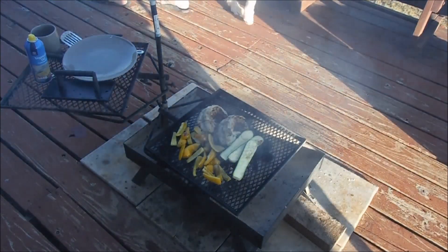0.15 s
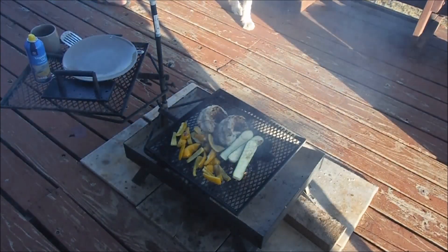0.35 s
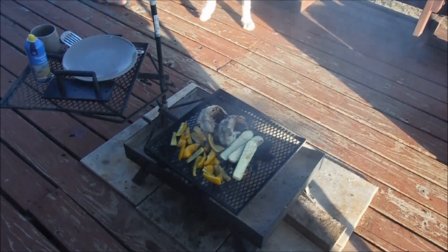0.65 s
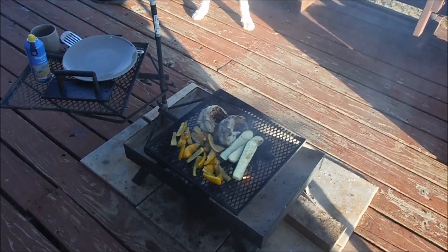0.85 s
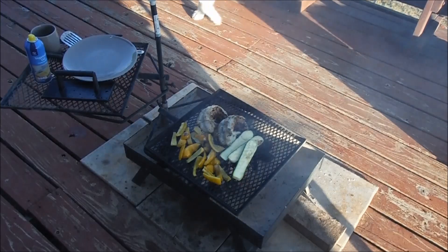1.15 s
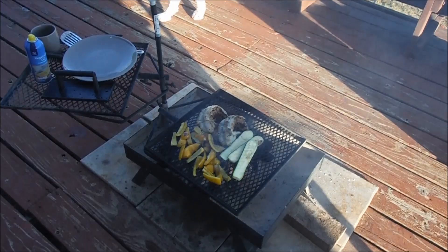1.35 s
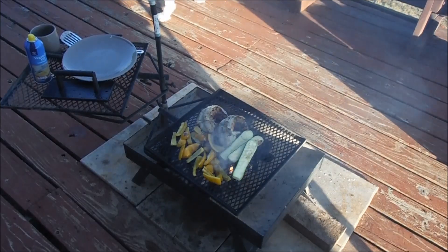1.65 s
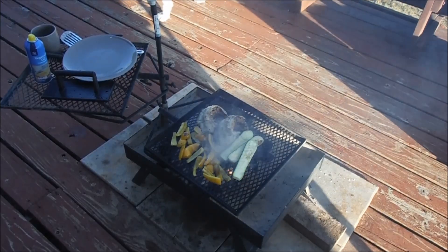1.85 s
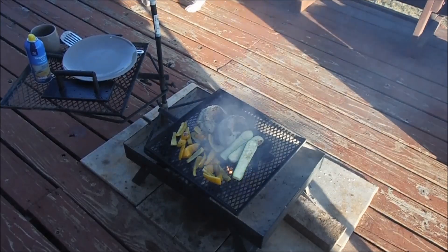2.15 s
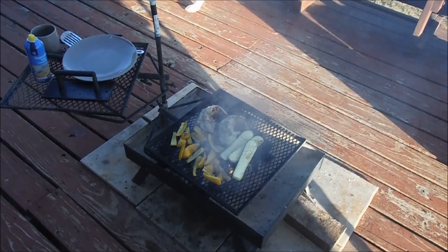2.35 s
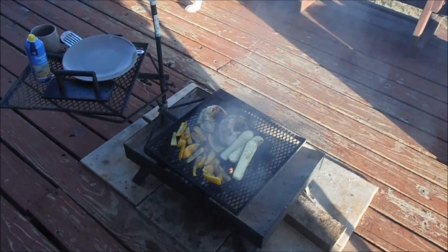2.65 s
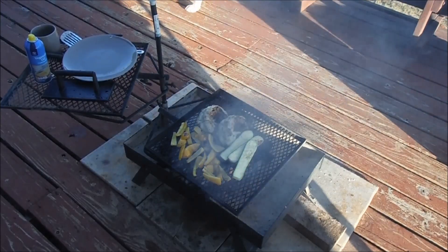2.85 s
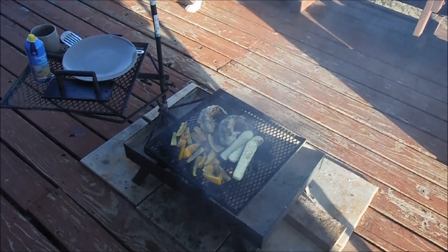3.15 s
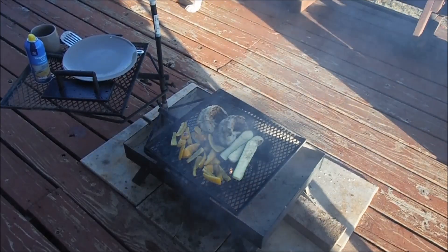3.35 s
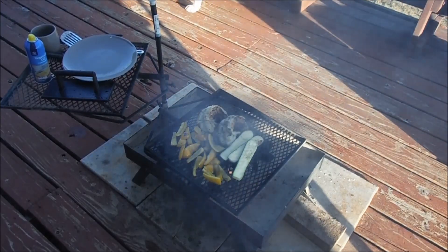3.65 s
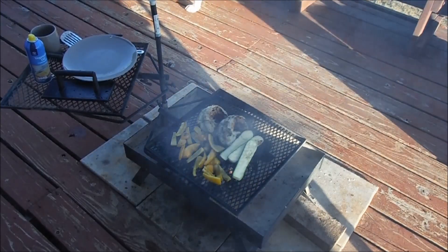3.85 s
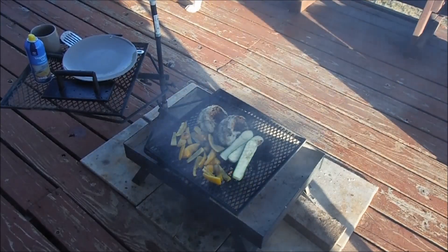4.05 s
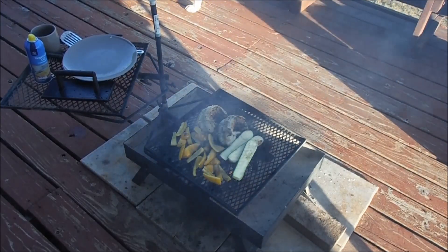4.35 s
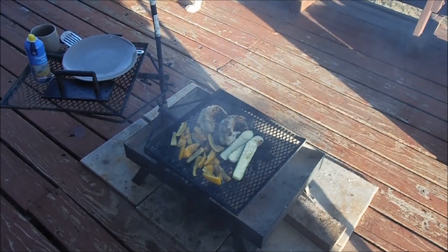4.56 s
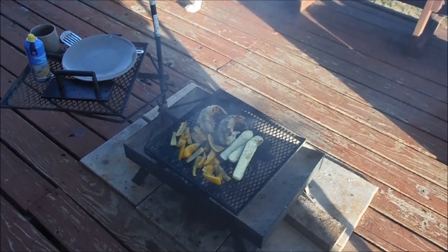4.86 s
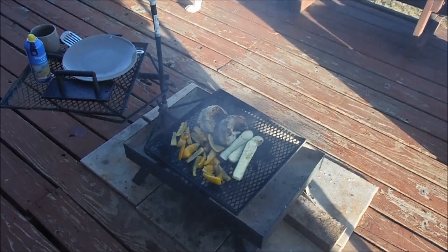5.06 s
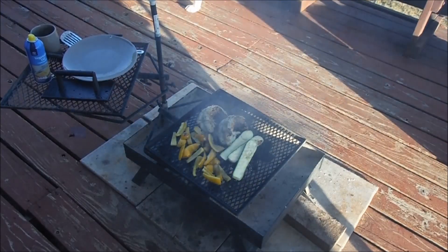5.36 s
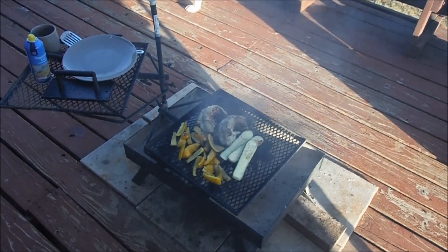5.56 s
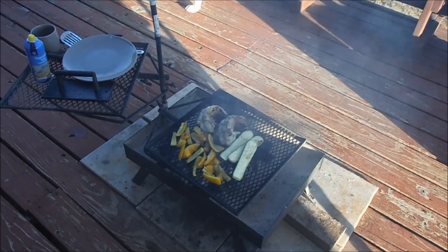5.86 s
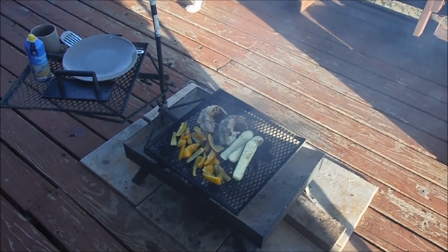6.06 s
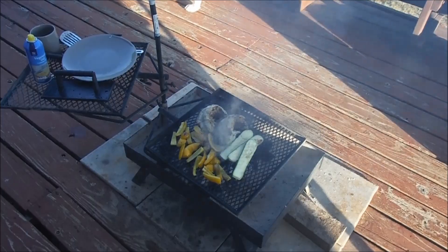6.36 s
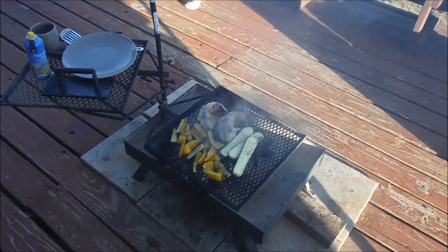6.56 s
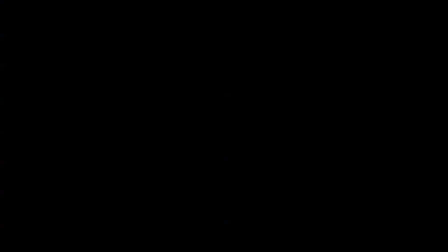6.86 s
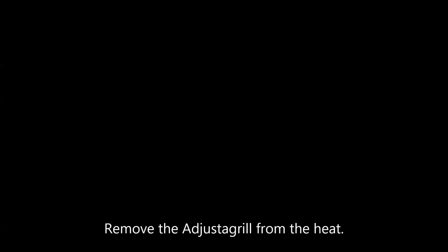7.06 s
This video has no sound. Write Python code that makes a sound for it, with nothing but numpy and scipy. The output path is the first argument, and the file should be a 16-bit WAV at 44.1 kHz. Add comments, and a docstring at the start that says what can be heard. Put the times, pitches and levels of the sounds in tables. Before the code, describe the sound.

A fine, high grill sizzle with scattered spits of fat and a faint hum, then close handling thumps and a sudden stop.

```python
"""A wooden deck outdoors, the microphone close to a charcoal grill of seafood and vegetables.
Behind it lie low air, a faint mains hum and a dog's paws scuffing the boards. Up front, tiny steam
bubbles burst on the food, fat spits, and juice boils and flares on the coals. Near the end a hand
rubs and knocks the camera, overloading its microphone, and switches it off."""
import sys
import numpy as np
from scipy import signal
from scipy.fft import rfft, irfft, next_fast_len
from scipy.io import wavfile
from scipy.ndimage import uniform_filter1d

SR = 44100
rng = np.random.default_rng(int(sys.argv[2]) if len(sys.argv) > 2 else 0)


def put_to_file(sound):
    """Save the sound as 16-bit audio at rate SR, in the file named by the first command-line argument."""
    columns = np.atleast_2d(sound).T  # one column per channel
    safe = np.clip(columns, -1, 1)
    whole_steps = np.round(safe * 32767)
    wavfile.write(sys.argv[1], SR, whole_steps.astype(np.int16))


N = 318402
TIME = np.arange(N) / SR


def undb(db):
    """Decibels to gain."""
    return 10 ** (np.asarray(db) / 20)


def unit(x):
    """Scale to rms 1."""
    return x / np.sqrt(np.mean(x ** 2))


def curve(rows):
    """Join (time, value) rows into a line through the scene."""
    return np.interp(TIME, *np.transpose(rows))


def colour(x, points):
    """Causal filter with the given (Hz, dB) outline; the result has rms 1."""
    size = 2 * next_fast_len(N // 2 + 4096)
    hz, db = np.transpose(points)
    gain = undb(np.interp(np.log(np.fft.rfftfreq(size, 1 / SR) + 1), np.log(hz), db))
    cepstrum = irfft(np.log(gain))
    cepstrum[1:size // 2] *= 2  # fold to minimum phase
    cepstrum[size // 2 + 1:] = 0
    return unit(irfft(rfft(x, size) * np.exp(rfft(cepstrum)))[:N])


def resonate(x, hz, width):
    """One resonance, gain 1 at its centre."""
    hz = min(hz, .45 * SR)
    w = 2 * np.pi * hz / SR
    a = np.sin(w) * width / hz / 2
    return signal.lfilter([a, 0, -a], [1 + a, -2 * np.cos(w), 1 - a], x)


def add(track, s, sound):
    """Mix a sound in from time s."""
    start = max(int(s * SR), 0)
    track[start:start + len(sound)] += sound[:N - start]


def walk(per_s):
    """Slow random drift with a spread near 1."""
    step = int(SR / per_s)
    held = np.repeat(rng.standard_normal(N // step + 1), step)
    return uniform_filter1d(held, step)[:N] * np.sqrt(3 / 2)


def bursts(per_s, spread_db):
    """Random tiny clicks, many weak and a few strong."""
    strength = np.minimum(rng.exponential(size=N), 6)
    clicks = (rng.random(N) < per_s / SR) * rng.choice([-1, 1], N)
    return unit(clicks * undb(spread_db * strength))


def swell(t, rise, fall):
    """A rounded rise to 1 at t = 0, then an exponential fall."""
    return np.exp(-np.where(t < 0, (t / rise) ** 2 / 2, t / fall))


def struck(modes, t):
    """Each mode's fading sine, one row a mode; wide modes start stronger and die sooner."""
    first_width = modes[0][1]
    return np.array([undb(db) * width / first_width * np.exp(-np.pi * width * t)
                     * np.sin(2 * np.pi * hz * t) for hz, width, db in modes])


def gritty_strokes(strokes, body, grit_db, spread):
    """Noise of friction or steam swells and dies with each stroke, and rings the body next to it."""
    out, t = np.zeros(N), TIME[:2 * SR // 3] - .2
    for s, db, rise, fall, hz, body_db in strokes:
        grit = rng.standard_normal(len(t)) * undb(grit_db * rng.standard_normal(len(t)))
        stroke = swell(t, rise, fall)
        rasp = unit(resonate(resonate(grit, hz, spread * hz), hz, 2 * spread * hz))
        ring = unit(sum(undb(g) * resonate(rng.permutation(grit), f, w) for f, w, g in body))
        lingering = np.where(t < 0, stroke, stroke ** 0.59)
        add(out, s + t[0], undb(db) * (rasp * stroke + undb(body_db) * ring * lingering))
    return out


# Open air around the deck: (frequency [Hz], relative level [dB])
AIR_SPECTRUM = [(20, -6.5), (40, -0.5), (60, -0.5), (85, -0.5), (140, -7), (250, -9.5), (400, -14),
                (700, -16.5), (1200, -19.5), (2500, -25), (8000, -41)]
# Mains hum in the background: (frequency [Hz], level [dB])
HUM_PARTIALS = [(59.9, -68.5), (120.2, -56.5), (179.7, -72.5)]
def outdoors(breeze_db=-52, drops_s=3.32, fall_db_per_s=0.9):
    """Low, gently moving air holds and then dies down over a steady hum."""
    air_db = breeze_db - fall_db_per_s * np.maximum(TIME - drops_s, 0)
    air = colour(rng.standard_normal(N), AIR_SPECTRUM) * undb(air_db + .7 * walk(4))
    hum = sum(np.sqrt(2) * undb(db) * np.sin(2 * np.pi * hz * TIME + .15 * walk(3))
              for hz, db in HUM_PARTIALS)
    return air + hum


# Paws off-mic: (time [s], level [dB], rise [s], fall [s], centre [Hz], board share [dB])
PAW_SCUFFS = [(2.241, -42, 0.0051, .008, 1060, -11), (2.260, -38, 0.01, 0.032, 1950, -2.5),
              (2.305, -37.5, 0.0071, 0.014, 1100, -15), (2.431, -39.5, 0.0011, 0.0082, 1120, -10),
              (2.585, -52.5, 0.013, 0.03, 520, -20), (2.655, -46.5, 0.0056, 0.01, 700, -3),
              (2.912, -40.5, 0.0017, 0.01, 1830, 0.5), (2.965, -35, 0.0011, 0.0098, 2100, 4.5)]
# Deck boards underfoot: (frequency [Hz], width [Hz], level [dB])
BOARD_MODES = [(216, 46, 9), (298, 130, 1.5), (544, 100, .5), (960, 160, 0), (1320, 160, -2),
               (1800, 220, 3), (2400, 440, -9), (6000, 4000, -4)]
def paws():
    """A dog's paws scrape the deck and set its boards ringing."""
    return gritty_strokes(PAW_SCUFFS, BOARD_MODES, grit_db=6.0, spread=1.13)


# Handling rumble, through the case into the microphone: (frequency [Hz], relative level [dB])
RUMBLE_SPECTRUM = [(12, -0.5), (30, -2.5), (60, -5.5), (120, -12), (250, -20.5), (500, -29.5), (1000, -42),
                   (3000, -60)]
# Squeezes on the case: (time [s], level [dB], rise [s], fall [s])
CASE_SQUEEZES = [(6.036, -31, .008, 0.016), (6.331, -19, .04, 0.05), (6.486, -17.5, 0.034, .011),
                 (6.585, -15.5, .015, 0.015)]
def grip(from_s=5.94, to_s=6.63, hold_db=-39.5, grab_db_per_s=195, release_db_per_s=94.5):
    """The case flexes and rumbles as the hand takes hold, squeezes and lets go."""
    grab_db = grab_db_per_s * np.maximum(from_s - TIME, 0)
    release_db = release_db_per_s * np.maximum(TIME - to_s, 0)
    hold = undb(hold_db - grab_db - release_db)
    squeezes = sum(undb(db) * swell(TIME - s, rise, fall) for s, db, rise, fall in CASE_SQUEEZES)
    return colour(rng.standard_normal(N), RUMBLE_SPECTRUM) * (hold + squeezes)


# Finger knocks right at the microphone:
# (time [s], push [dB], contact [s], crack [dB], brightness [Hz], spread over the modes [octaves])
FINGER_KNOCKS = [(5.81, -32, 0.00077, -33, 6000, 1.4), (5.9039, -27, 0.00028, -16.5, 8140, 0.47),
                 (5.9156, 5, 0.00035, -13.5, 2400, 1.9), (6.348, -26.5, .0004, -35.5, 4500, 1.7),
                 (6.4081, -14.5, .0004, -14.5, 5500, 1.3), (6.4271, 2.5, .0006, -1, 5250, 2.0),
                 (6.448, -16, 0.00028, -19.5, 4840, 1.8), (6.4664, -2, 0.00074, -32, 1000, 1.0),
                 (6.507, -28, .0002, -40, 1800, .92), (6.553, -16.5, 0.001, -42.5, 1500, 1.0),
                 (6.5835, 7.5, .0005, -7, 3080, 0.31), (6.601, 3, 0.0072, -40.5, 3000, 1.2),
                 (6.615, -7.5, 0.0005, -12, 3650, 1.34)]
# The camera's shell: (frequency [Hz], width [Hz], level [dB])
SHELL_MODES = [(660, 360, 5.5), (1320, 420, 3), (2000, 350, 2.5), (3080, 220, 2), (3720, 300, 0),
               (5170, 360, -1), (7260, 870, -1.5), (8650, 450, -2.5), (13600, 2600, -7)]
def knocks(crack_s=0.0005, shell_db=-3.5, leak_hz=15):
    """A finger pushes on the microphone's air pocket; as it lets go the shell cracks and rings."""
    push, crack, t = np.zeros(N), np.zeros(N), TIME[:4096]
    shell, shell_hz = struck(SHELL_MODES, t), np.array(SHELL_MODES)[:, 0]
    for s, push_db, contact, crack_db, hz, octaves in FINGER_KNOCKS:
        add(push, s, -undb(push_db) * t / contact * np.exp(1 - t / contact))
        # each spot on the shell wakes its own modes, in either direction
        reach = np.exp(-(np.log2(shell_hz / hz) / octaves) ** 2) * rng.choice([-1, 1], len(shell))
        snap = rng.standard_normal(len(t)) * np.exp(-t / crack_s)
        snap = resonate(resonate(snap, hz, 2.0 * hz), hz, 2.8 * hz)
        add(crack, s + 3 * contact, undb(crack_db) * (snap + undb(shell_db) * reach @ shell))
    # the pocket leaks, so the pressure swings back after each push
    return signal.lfilter(*signal.butter(1, leak_hz, "high", fs=SR), push) + crack


# Skin by the microphone: (time [s], level [dB], rise [s], fall [s], centre [Hz], shell share [dB])
SKIN_RUBS = [(5.835, -52.5, 0.021, .068, 3980, -3), (5.935, -42.5, 0.026, 0.056, 4900, -7),
             (6.005, -38, 0.022, 0.024, 4960, -4.5), (6.085, -44.5, .038, 0.067, 4530, -7.5),
             (6.213, -39, .013, 0.0028, 3300, -0.5), (6.252, -48.5, 0.0088, .008, 4000, 0.5),
             (6.452, -27.5, 0.0028, 0.0072, 7230, -5), (6.473, -28.5, 0.0064, 0.0075, 6300, -0.5),
             (6.608, -31.5, 0.0062, 0.0052, 3530, 3)]
def rubs():
    """Skin slides over the camera, and the friction rings its shell."""
    return gritty_strokes(SKIN_RUBS, SHELL_MODES, grit_db=2, spread=0.7)


# Taps of the camera on its stand: (time [s], level [dB])
STAND_TAPS = [(6.624, -34.5), (6.696, -43.5), (6.767, -49.5)]
# The stand under the microphone: (frequency [Hz], width [Hz], level [dB])
STAND_MODES = [(456, 20, 1), (700, 31, -7), (1145, 29, -14), (1300, 33, -23.5), (3100, 18, -21.5)]
def rocking():
    """The camera rocks to rest, ringing its stand more weakly each time."""
    out = np.zeros(N)
    ring = struck(STAND_MODES, TIME[:SR // 3]).sum(axis=0)
    for s, db in STAND_TAPS:
        add(out, s, undb(db) * ring)
    return out


# Flares under the grate: (time [s], level [dB], rise [s], fall [s], centre [Hz], firebox share [dB])
STEAM_FLARES = [(0.773, -48.5, 0.0021, 0.0095, 4220, -1.5), (1.037, -42, .0008, .002, 1100, 2),
                (1.055, -45.5, .034, 0.066, 7250, -12), (1.39, -58, 0.1, 0.21, 4800, 2.5),
                (1.66, -53, 0.041, 0.041, 6000, 6), (2.07, -59, 0.058, 0.094, 3230, 2),
                (4.04, -58, 0.094, .08, 13000, -25), (4.99, -60, .04, 0.089, 3600, -4),
                (5.65, -60, 0.04, 0.17, 5500, -15)]
# The firebox around the coals: (frequency [Hz], width [Hz], level [dB])
FIREBOX_MODES = [(1760, 380, -6), (2220, 300, 0.5), (3860, 400, -5), (5440, 500, -1.5), (7400, 640, -1.5)]
def flares():
    """Fat and juice flash to steam, and the firebox resonates."""
    return gritty_strokes(STEAM_FLARES, FIREBOX_MODES, grit_db=5.5, spread=0.59)


# Hiss from down on the coals: (frequency [Hz], relative level [dB])
JUICE_SPECTRUM = [(400, -11), (900, -6), (1200, 4.5), (1650, -5.5), (2100, 3.5), (2900, -5.5), (3900, 0.5),
                  (4500, -7), (5400, 1), (7500, -12), (14000, -20.5)]
def juice(heat_db, usual_db=-59.5, usual_heat_db=-50, follows=0.38):
    """Dripping juice boils off the coals with a lower hiss that follows the heat only in part."""
    boiling = unit(rng.standard_normal(N) + undb(-3) * bursts(per_s=1500, spread_db=3.5))
    juice_db = usual_db + follows * (heat_db - usual_heat_db)
    return colour(boiling, JUICE_SPECTRUM) * undb(juice_db + 0.48 * walk(12))


def faint_drops(heat_db, first_per_s=9.9, later_per_s=3, settle_s=1.2, over_heat_db=19.5, body_db=-12):
    """Rows for small spits of fat: random, thinning out, as strong as the food fries."""
    per_s = later_per_s + (first_per_s - later_per_s) * np.exp(-TIME / settle_s)
    peak_db = heat_db + over_heat_db + rng.standard_normal(N)
    return [(TIME[i], peak_db[i], body_db) for i in np.flatnonzero(rng.random(N) < per_s / SR)]


# Loud spits of fat, close up: (time [s], peak level [dB], low body share [dB])
LOUD_SPITS = [(0.049, -22.5, -24), (0.0857, -27.5, -7), (0.1374, -23.5, -6), (0.2177, -26.5, -6),
              (0.2327, -26.5, -10), (0.4508, -22.5, -4.5), (0.5616, -24.5, -7), (1.036, -22, -1),
              (1.0894, -25, -10), (3.2114, -27.5, -11), (3.2452, -27, -2), (3.352, -22, -11),
              (3.6561, -28.5, -9), (4.1026, -26.5, -22), (4.3081, -31, -8)]
def spits(heat_db, centre_hz=7300, pitch_spread=0.035, lag_s=.0013):
    """A drop of fat bursts: a sharp snap, its scatter off the grate, then a faint tail from the deck."""
    out, t = np.zeros(N), TIME[:2048]
    scatter = undb(-15) * np.exp(-t / 0.0011)
    tail = undb(-31) * np.exp(-t / 0.0074)
    for s, db, body_db in LOUD_SPITS + faint_drops(heat_db):
        hz = centre_hz * np.exp(pitch_spread * rng.standard_normal())
        snap = (t == 0) + rng.standard_normal(len(t)) * (scatter + tail)
        body = undb(body_db) * resonate(snap, hz=2400, width=3200)
        tick = resonate(resonate(snap, hz, 0.43 * hz) + body, hz, 1.24 * hz)
        add(out, s + lag_s, undb(db) * tick / np.abs(tick).max())
    return out


# The sizzle in front of the microphone: (frequency [Hz], relative level [dB])
SIZZLE_SPECTRUM = [(1500, -32), (3000, -18.5), (4600, -13.5), (5900, -9), (7200, -3), (8700, -3.5),
                   (10500, -8), (13000, -13.5), (16000, -16.5)]
# Fizz of single pieces on the grate: (frequency [Hz])
PIECE_PITCHES = [5500, 6600, 7500, 8800, 10400]
def sizzle(heat_db, over_heat_db=1.2, flutter=.22, piece_width_hz=800):
    """Steam bubbles burst on the food in thousands; each piece spurts and rests on its own."""
    bubbles = unit(rng.standard_normal(N) + undb(-1.0) * bursts(per_s=2800, spread_db=3.5))
    spurts = sum(flutter * walk(18) * resonate(bubbles, hz, piece_width_hz) for hz in PIECE_PITCHES)
    return colour(bubbles + spurts, SIZZLE_SPECTRUM) * undb(heat_db + over_heat_db + .5 * walk(27))


# How hard the food fries: (time [s], level [dB])
FRYING_HEAT = [(0.0, -52.5), (0.98, -51), (1.19, -48.5), (2.6, -56), (4.13, -51.5), (5.39, -57),
               (5.65, -55), (5.8, -52.5)]
# The palm shields the microphone from the deck: (time [s], gain [dB])
PALM_SHIELD = [(6.43, -0.5), (6.53, -8.5)]
def scene():
    """Air, paws and grill reach one microphone, shielded at the end by the hand on the camera."""
    heat_db = curve(FRYING_HEAT)
    hand = grip() + knocks() + rubs() + rocking()
    background = outdoors() + paws()
    grill = sizzle(heat_db) + juice(heat_db) + flares() + spits(heat_db)
    return ((background + grill) * undb(curve(PALM_SHIELD)) + hand)[None]


OFF_S, TOP_HZ = 6.8975, 15800
def record(dry):
    """The microphone clips on the knocks; the sound stops at switch-off; the top is cut."""
    clipped = np.clip(dry, -.97, .97) * (TIME < OFF_S)
    return signal.sosfilt(signal.ellip(10, .1, 80, TOP_HZ, fs=SR, output="sos"), clipped)


dry = scene()
out = record(dry)
put_to_file(out)
```